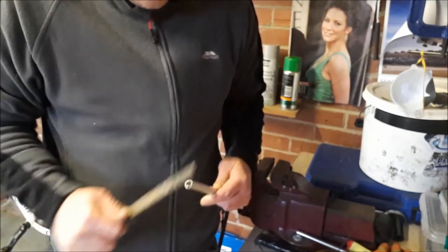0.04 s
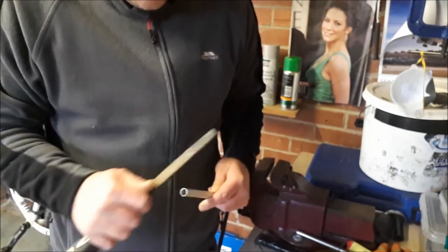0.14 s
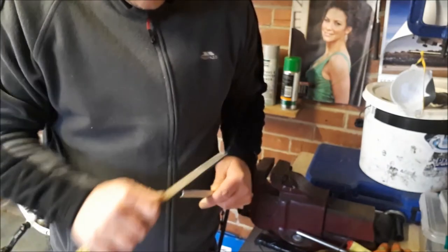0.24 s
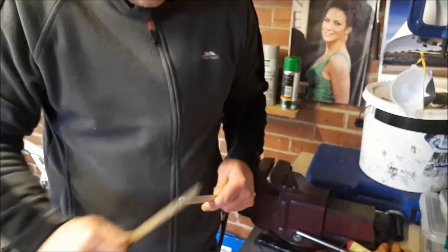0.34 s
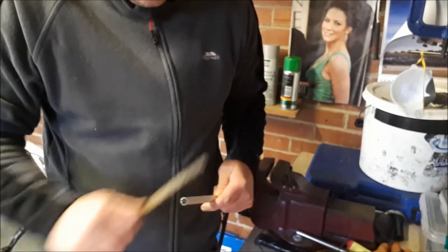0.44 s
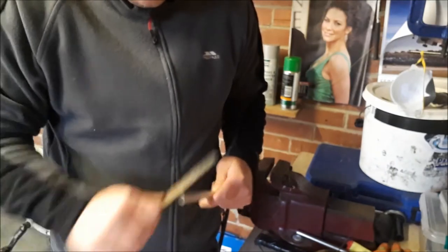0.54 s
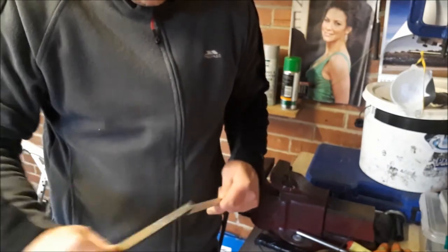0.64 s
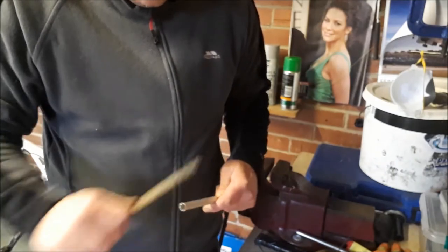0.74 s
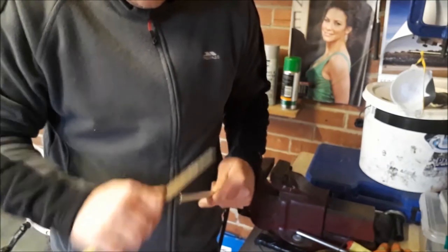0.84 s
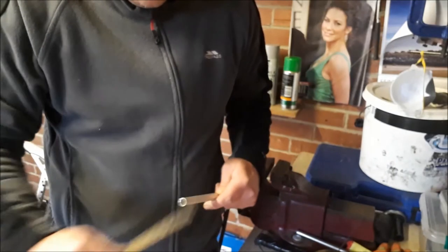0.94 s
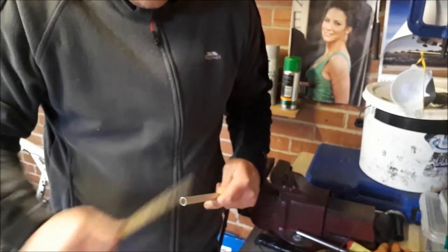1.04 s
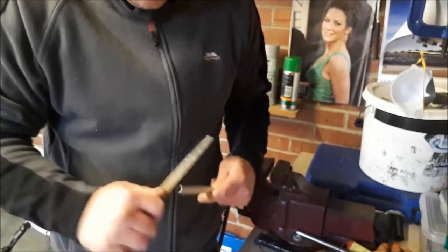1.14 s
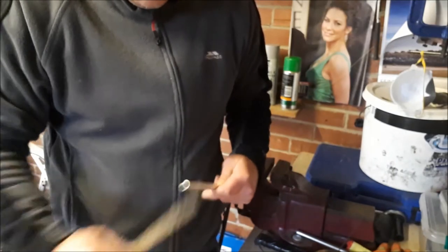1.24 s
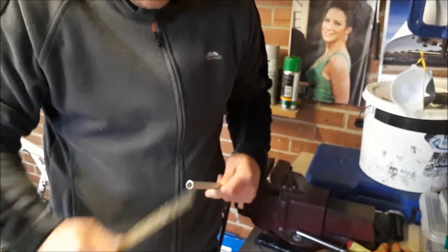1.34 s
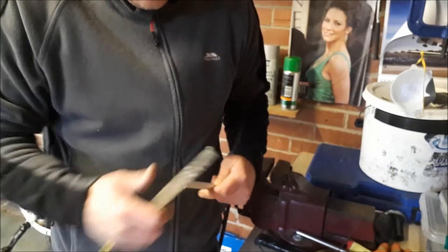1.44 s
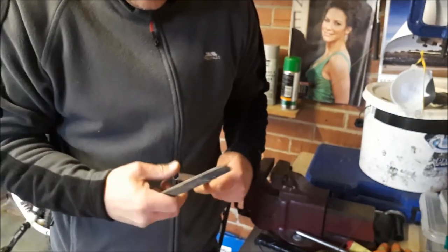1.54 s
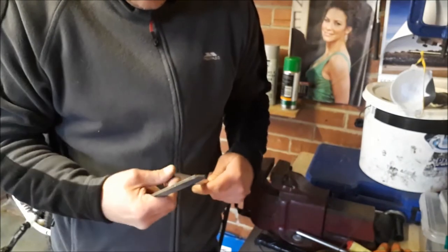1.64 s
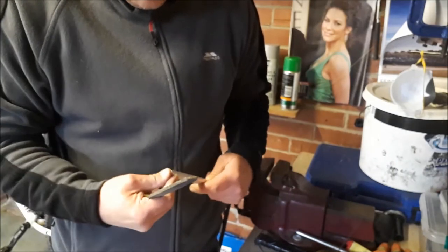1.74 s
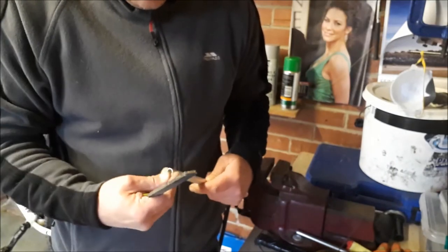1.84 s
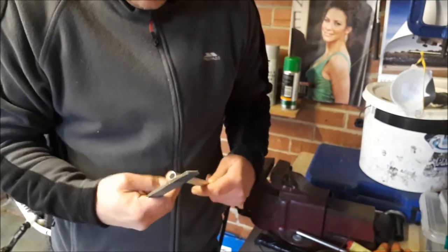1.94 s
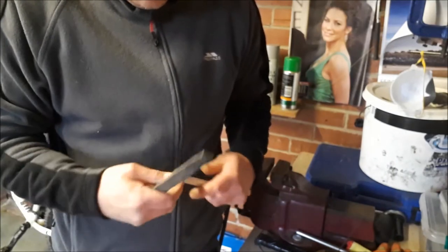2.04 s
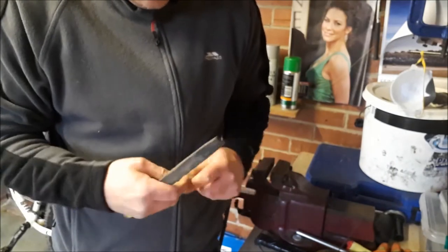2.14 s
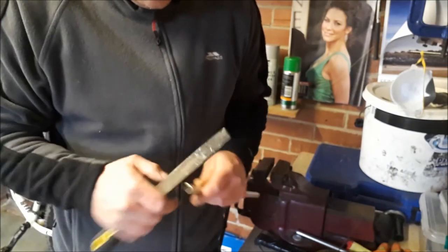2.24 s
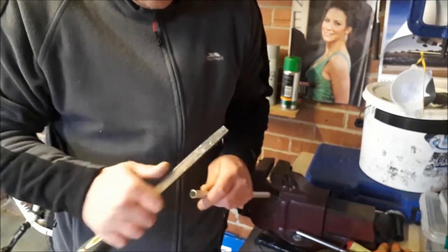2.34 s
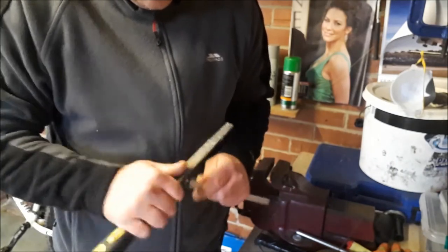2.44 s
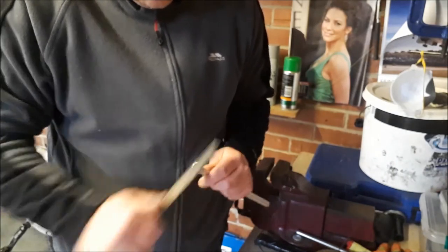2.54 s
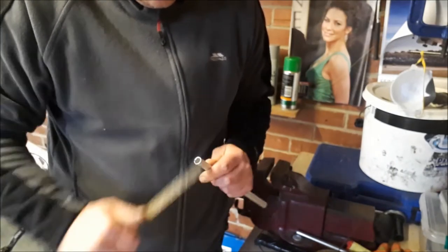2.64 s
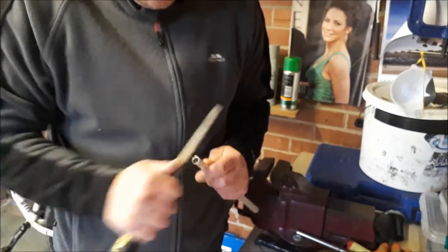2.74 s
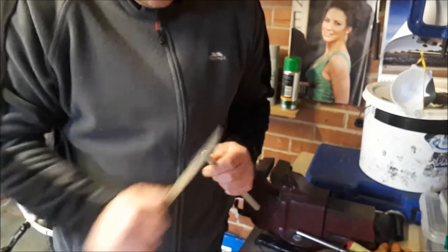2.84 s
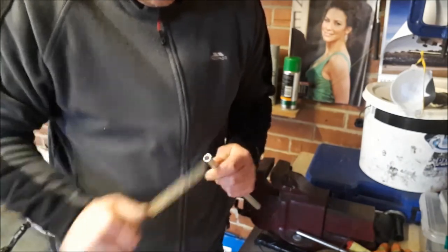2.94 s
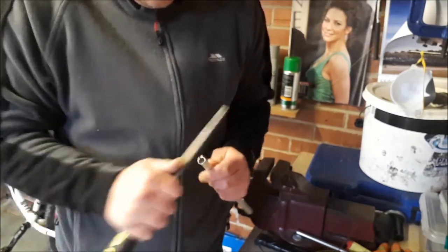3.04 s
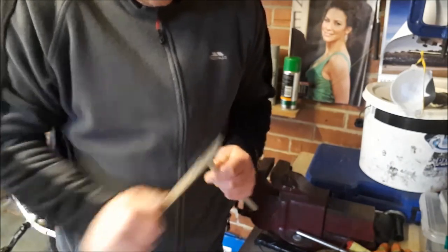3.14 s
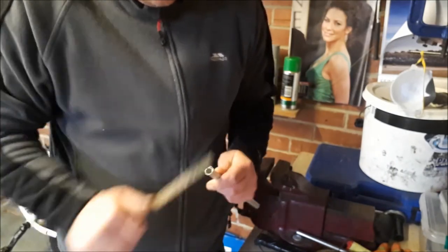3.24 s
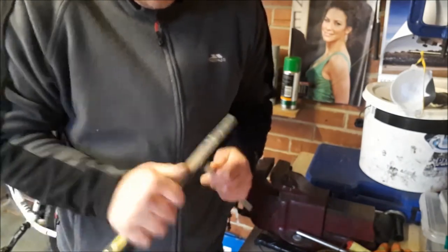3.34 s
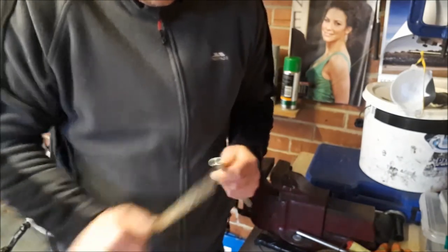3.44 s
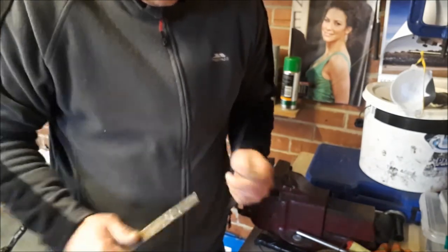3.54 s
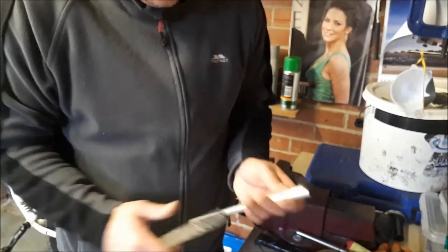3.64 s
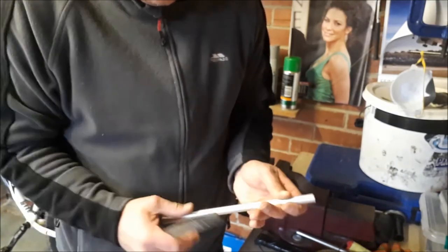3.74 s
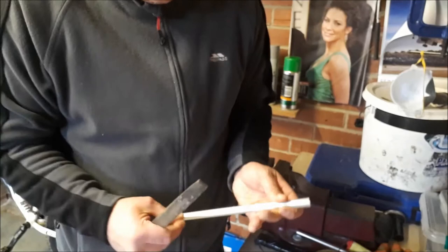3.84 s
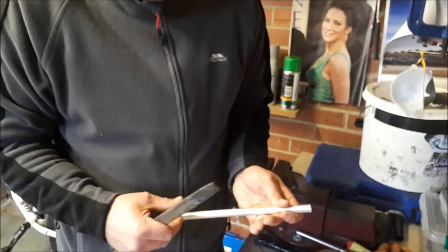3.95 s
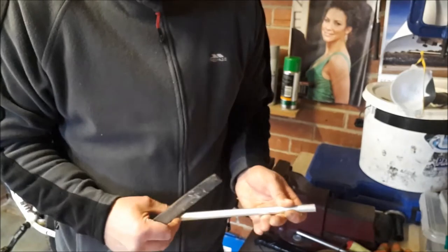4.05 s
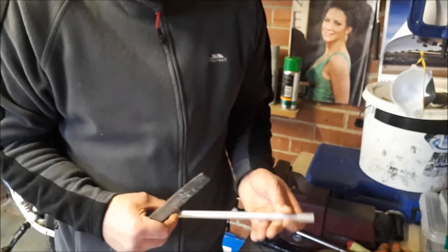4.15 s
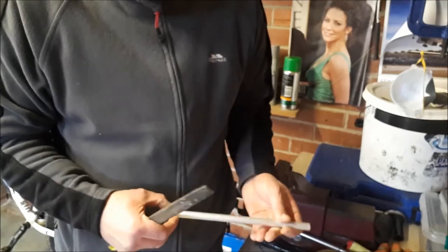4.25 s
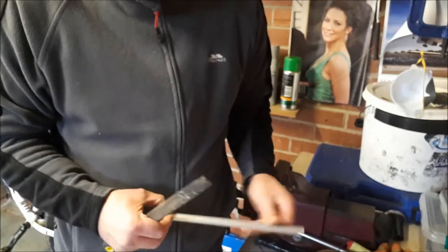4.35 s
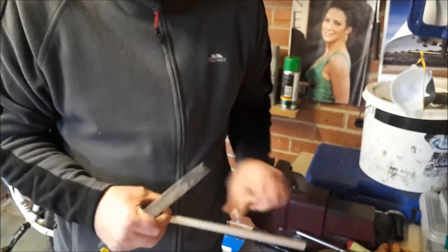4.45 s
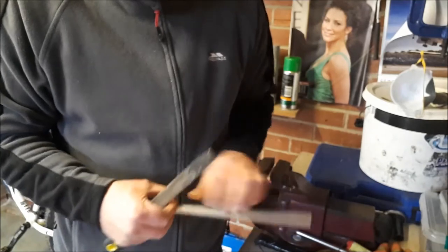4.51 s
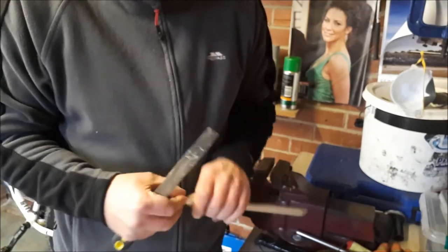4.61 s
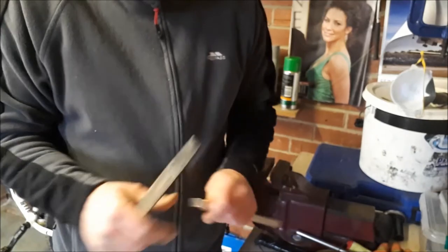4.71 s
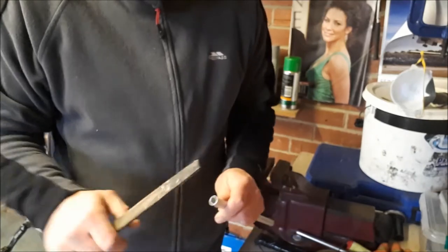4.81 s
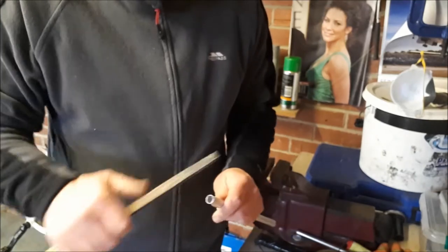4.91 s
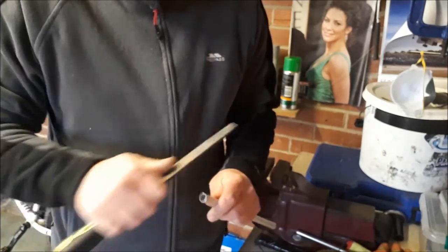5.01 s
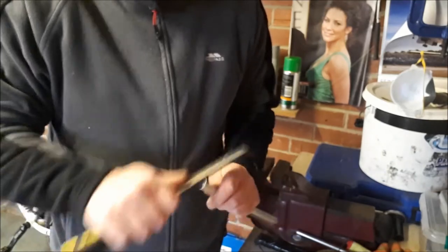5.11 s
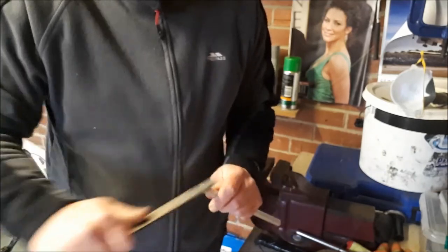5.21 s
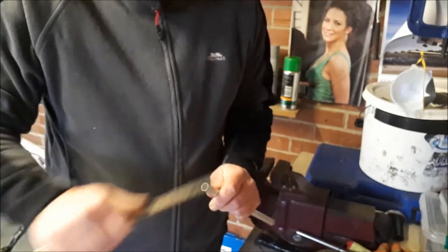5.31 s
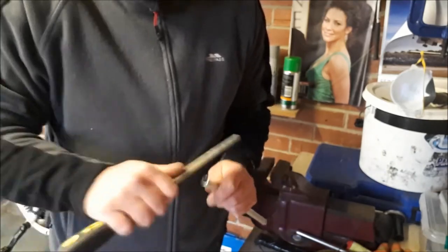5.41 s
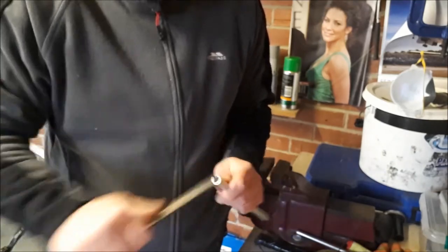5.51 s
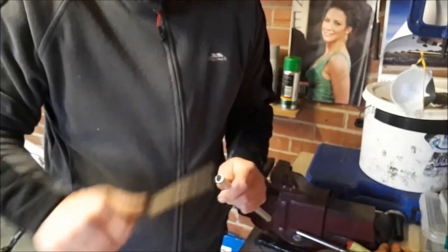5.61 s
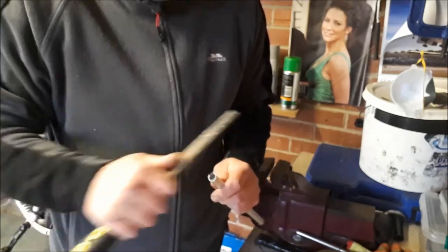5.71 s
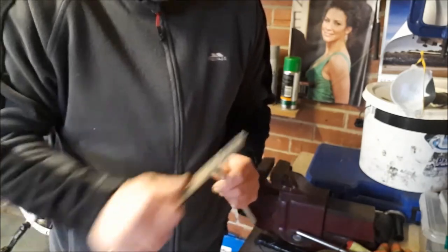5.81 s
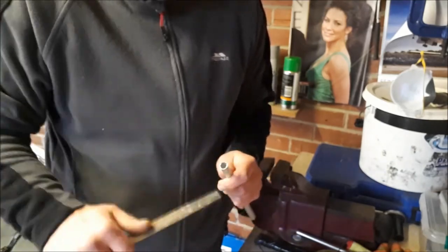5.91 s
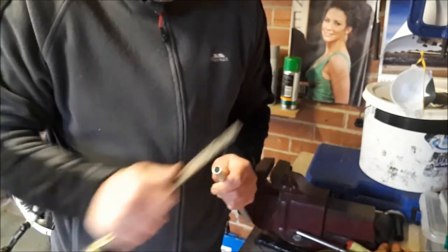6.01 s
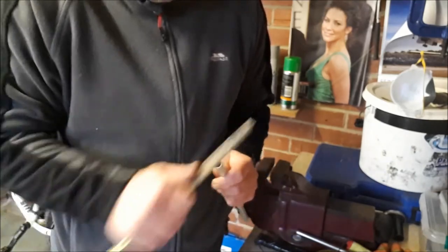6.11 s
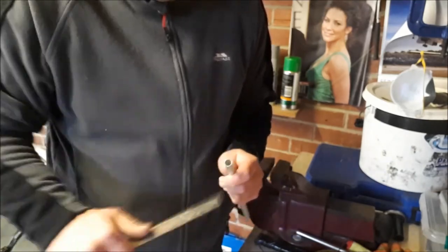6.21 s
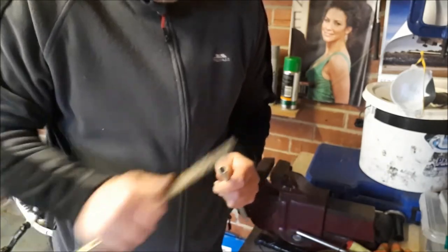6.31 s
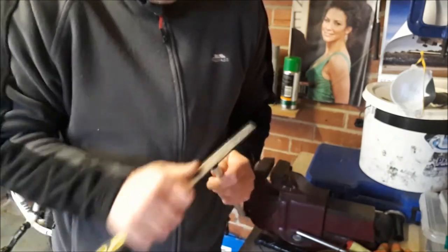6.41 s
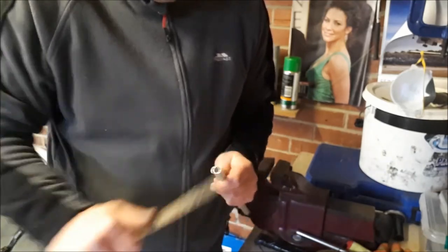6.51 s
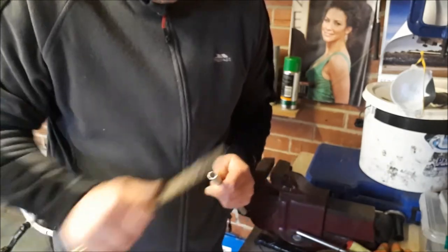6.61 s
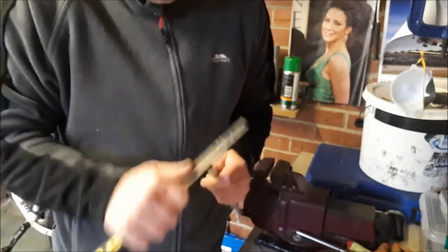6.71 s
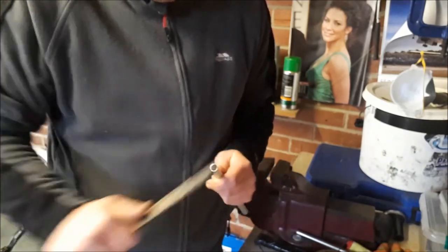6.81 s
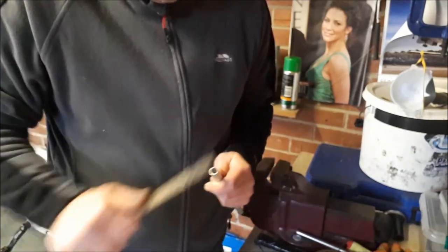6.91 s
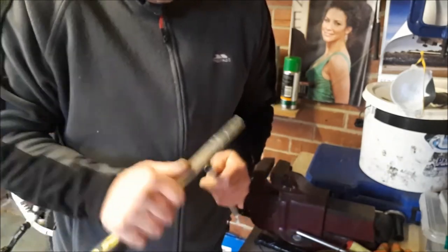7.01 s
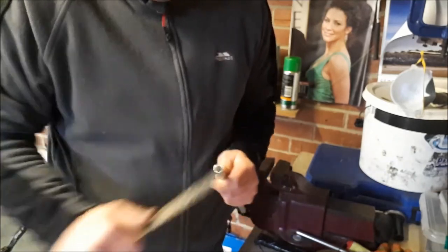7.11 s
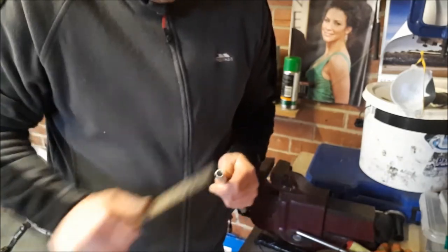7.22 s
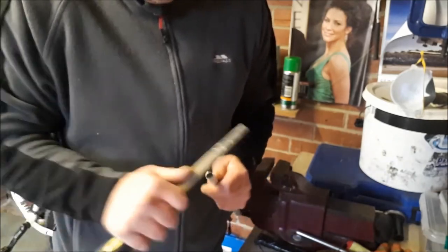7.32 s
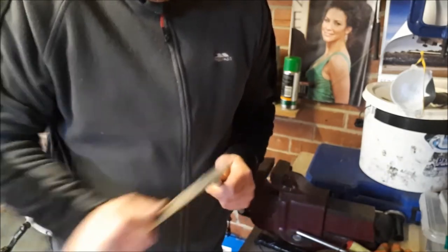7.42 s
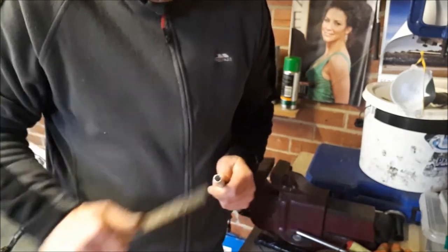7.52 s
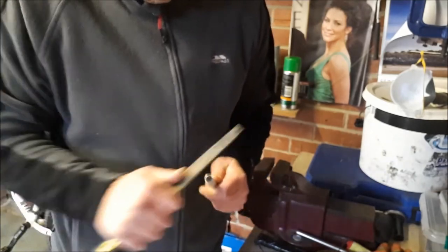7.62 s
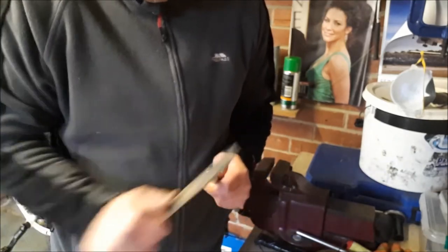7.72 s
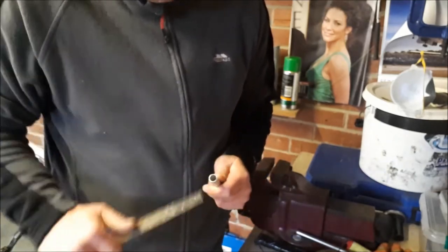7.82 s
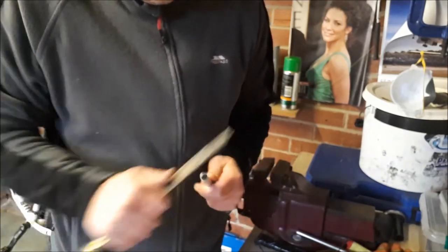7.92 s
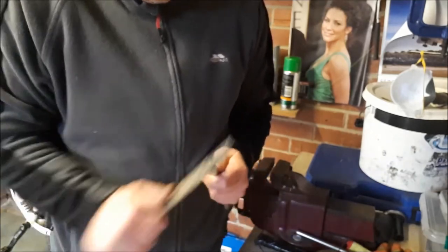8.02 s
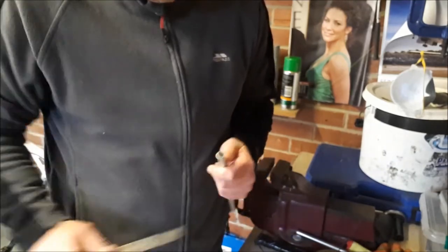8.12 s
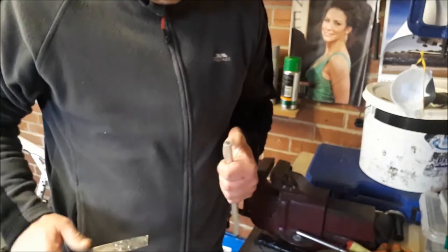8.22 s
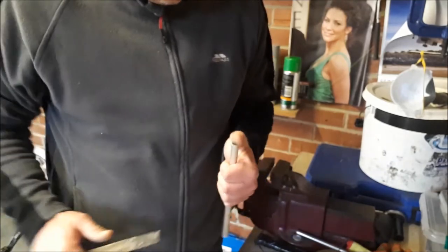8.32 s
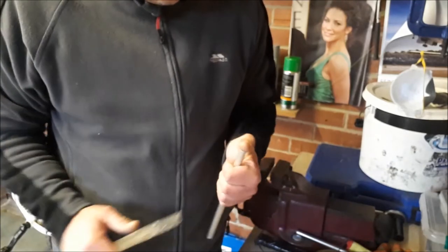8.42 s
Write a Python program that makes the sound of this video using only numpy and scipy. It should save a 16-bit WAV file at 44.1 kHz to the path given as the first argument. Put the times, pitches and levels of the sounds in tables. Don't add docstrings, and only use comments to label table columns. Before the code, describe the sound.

Close, bright and dry in a small garage, over a low steady bed of mains hum, far fan and dull traffic drone. A faint tail of a scrape opens at 0 s, then file strokes at about 0.26, 0.6, 0.9 and 1.2 s: a light click followed by a gritty rasp of roughly a tenth of a second. From 1.4 to 2.5 s only tiny finger rustles on steel. Four harder strokes follow at 2.5, 2.8, 3.15 and 3.4 s, with strong clicks and burrs snagging the teeth. From 3.7 to 5.1 s it is nearly quiet, with faint rustles and thin metallic touches. At 5.2 s filing resumes with strokes about every 0.3 s until 8.0 s, a small double contact near 5.5 s, the landings growing sharper. Each stroke rings mostly around 2.5 to 3 kHz with no bass and a short room tail. A slight rustle at 8.2 s ends it.

```python
import sys
import numpy as np
from scipy import signal
from scipy.fft import rfft, irfft
from scipy.io import wavfile

SR = 44100
rng = np.random.default_rng(int(sys.argv[2]) if len(sys.argv) > 2 else 0)


def file_out(sig):
    cols = np.atleast_2d(sig).T
    lim = np.clip(cols, -1, 1)
    pcm = np.round(lim * 32767).astype(np.int16)
    wavfile.write(sys.argv[1], SR, pcm)


def invert_db(x):
    u = np.asarray(x, float) / 20
    return 10 ** u


N = 373086

# frequency in Hz, strength in dB per Hz.
AIR = [(25, -50), (60, -37.5), (130, -8.5), (260, -10), (450, -11), (880, -9), (1350, -16), (2000, -17),
       (3150, -27.5), (3380, -34), (5500, -38.5), (7000, -33.5), (9200, -43), (16000, -51)]
AIR_DB = -48.5
# frequency in Hz, likeness from 0 to 1.
AIR_LIKENESS = [(60, 1), (180, 0.91), (550, 0.92), (1650, 0.3), (4970, 0.053), (15000, 0.0184)]
# frequency in Hz, left over right in dB.
AIR_BALANCE = [(60, -12), (150, 8), (380, -3), (950, 0), (2380, -1), (5980, -4.5), (15000, 8.5)]
# frequency in Hz, width in Hz, rms level in dB.
DRONE = [(35.8, 5.5, -72.5), (102, 26, -58.5), (310.8, 7, -60), (409, 25, -57), (458.6, 45, -50.5),
         (557, 27, -55), (655.4, 62, -55.5), (730, 11.1, -79), (858, 26, -57)]
FAN_LAG_S = 0.00035
# time in seconds, level in dB.
RUMBLE = [(0.0, -58.5), (0.87, -52), (2.12, -57), (4.729, -58), (4.9, -57), (5.301, -56), (5.77, -61),
          (6.01, -56), (6.41, -69), (7.66, -74), (7.84, -53), (8.46, -80)]

# start in seconds, then seconds after it when the push begins, is full,
# and lifts, then tooth chatter in Hz.
STROKES = [(0.0, 0.0045, 0.0081, 0.023, 2400), (0.257, 0.032, 0.056, 0.15, 2930),
           (0.6075, .01, 0.062, 0.12, 3251), (0.9255, 0.0089, 0.029, 0.089, 2955),
           (1.2294, 0.011, 0.026, 0.087, 2750), (2.5413, 0.0095, 0.037, 0.1, 2900),
           (2.8418, 0.015, 0.062, 0.099, 2800), (3.147, 0.03, 0.047, 0.13, 2820),
           (3.4255, 0.033, 0.069, 0.081, 2630), (5.171, 0.015, 0.044, .13, 2950),
           (5.5263, .002, 0.014, 0.074, 2850), (5.8421, 0.013, 0.036, 0.088, 2935),
           (6.1531, 0.039, 0.072, 0.089, 2760), (6.4664, 0.052, 0.076, 0.11, 2814),
           (6.7774, 0.057, 0.11, .11, 2700), (7.0896, 0.071, 0.084, 0.097, 2760),
           (7.4003, 0.07, 0.1, 0.11, 2770), (7.7167, .045, 0.081, 0.11, 2450),
           (8.0196, 0.019, 0.041, 0.087, 2646)]
# graze in dB, full push in dB, level at the lift in dB,
# fine grit in dB against the rasp, tube body in dB against the rasp.
EFFORT = [(-45.5, -52, -43, -3, -13), (-36, -25, -26.5, -7, -11), (-28, -21.5, -28.5, -3.5, -5.5),
          (-29, -27, -20, -5, -10), (-28.5, -23.5, -22, -4, -9), (-30, -18.5, -19.5, -8.5, -11),
          (-26, -19, -13.5, -9, -10.5), (-26, -23, -32.5, -8.5, -7.5), (-26, -18.5, -19.5, -7, -7.5),
          (-29.5, -18, -27.5, -5, -12.5), (-23, -23, -38.5, -2, -7), (-23, -21, -16, -10.5, -8),
          (-27, -17.5, -16, -9, -5.5), (-26.5, -19.5, -20, -5.5, -7.5), (-27, -22.5, -16, -6, -7),
          (-27, -19, -21, -6.5, -9), (-31.5, -17.5, -16, -5.5, -9.5), (-27, -22.5, -22, -7, -7),
          (-26.5, -19, -16, -8.5, -13.5)]
# frequency in Hz, strength in dB per Hz.
RASP = [(290, -50), (500, -15.5), (810, -27.5), (1310, -9.5), (1450, -10.5), (3020, 0.5), (3880, -4),
        (7710, -23.5), (12100, -19.5), (15100, -9.5), (16500, -53)]
GRIT_GROWS_DB, BODY_GROWS_DB, CHATTER_SAG = 3.5, 1, 0.03
LIFT_S = 0.024
BOUNCE_DB, BOUNCE_S = -4, 0.018
GRAZE_SAG_DB_PER_S = 67

# time in seconds, peak in dB, bright part in dB against the peak,
# knock in Hz, thin ring in dB.
LANDINGS = [(0.258, -22, -1.5, 1780, -2.5), (0.6074, -16.5, -10, 3230, -12), (0.9248, -19.5, 0, 3300, -7),
            (1.2283, -13.5, -5.5, 3360, -1.5), (2.539, -13, -5, 2400, -3.5), (2.842, -6, -2.5, 2517, -9),
            (3.1458, -4.5, -3.5, 2560, 2.5), (3.4256, -5, 1, 2640, -1.5), (5.1697, -17, -3, 2585, -17),
            (5.506, -19, -4, 2690, -5), (5.5252, -17, -5.5, 2995, -15), (5.8425, -10.5, -24, 2810, 13),
            (6.1537, -11, -21, 2700, 2), (6.4676, -7, 3, 2860, -8), (6.7792, -7.5, -36, 2830, -1),
            (7.0901, -5.5, 6.5, 2820, 0), (7.398, -5, 2.5, 2590, -7), (7.7167, -3, -1, 2574, -10),
            (8.0209, -6.5, -8.5, 2590, 5)]
# frequency in Hz, level in dB.
RIM_PINGS = [(3700, 0), (3500, -0.5), (3420, 5), (4000, 2.5), (3660, -3), (5125, -5), (4120, 0),
             (4170, 4.5), (3380, -6.5), (3360, -0.9), (5200, 3), (3480, 0.5), (4100, -10), (3470, 0.5),
             (3570, 4), (4085, 2.5), (4165, 0.5), (4300, -4.3), (4100, -12)]
PING_DB, PING_S = -8, 0.0013

# frequency in Hz, width in Hz, level in the first grip in dB,
# level in the later grip in dB, left over right in dB.
STEEL = [(1210, 340, -22, -16.5, -2), (1850, 300, -10, -14, 5.5), (2850, 380, -14, -7.5, -10),
         (3710, 270, -23, -8.5, -7.5), (4240, 250, -11, -11.5, 3), (4860, 250, -14, -11, 1),
         (6200, 330, -16, -19.5, 8.5), (7100, 340, -20.5, -16.5, -19), (8460, 25, -14.5, -34, 7.5),
         (8250, 110, -24, -23.5, 2.5), (9480, 350, -16.5, -34, 4), (10650, 690, -15, -20, 9.5),
         (11500, 940, -10, -19, 4)]
REGRIP_S = 2.0
# lowest mode in dB, second mode in dB, fourth mode in dB, high pair in dB.
HOLD = [(0.1, 8, 0.1, 0.1), (3, 3.8, 2.1, 0), (2, -5.5, -3, 0), (-1, 1.9, 0.1, 3), (-9, 2.5, -1.1, -1),
        (-10, 1.3, -1.5, -7), (2.5, -3, 4, -1.5), (-1, -5, -3, 2.5), (-1.5, -5, -3, 0.5), (3, -2, -2, -7),
        (5, 1, 0.1, 2), (5, -3, 3, -12), (-1, 4.5, -2, -3), (-1.5, 1, -1.1, 0), (-5, -1, 1, -2.5),
        (2, 2, 3, -0.5), (3, -4, -2.5, 1.5), (-1, -1.5, -6.5, -1), (-1.5, 2, 0.5, 2.5), (-1, 4, 1, 1.5)]
# frequency in Hz, width in Hz, level in dB,
# left over right in dB.
FREE_MODES = [(1388, 45, -19, 0), (2345, 25, -11.5, -0.5), (2760, 40, -8, -1.1), (4080, 45, -13, 0.1)]

# ring near the tip in Hz, near the handle in Hz,
# their level in dB against the rasp, side ring in Hz, its level in dB against the rasp.
GRIP_RINGS = [(2080, 2290, -19, 3410, -10.5), (3380, 2710, 1, 6000, -8), (3230, 2600, -15, 1210, -18.5),
              (2310, 2560, -15, 3600, -15), (2950, 3040, -2.5, 6300, -12), (2700, 2970, -1.5, 1315, -8.5),
              (2790, 2200, -8.5, 4000, -19), (2660, 2830, -4, 4800, -5.5), (2990, 3030, 0.5, 4400, -13),
              (2960, 1900, -3.5, 3800, -10), (2990, 3000, -2.5, 1400, -6), (2700, 2400, 1, 1590, -14),
              (2840, 2500, -6.5, 3200, -17), (2160, 2600, -7, 1035, -16), (2750, 2870, -4.5, 4400, -7),
              (2760, 2976, -10, 2320, -13.5), (2590, 2760, -6, 2900, -8), (1720, 2600, -4.5, 860, -9)]
HANDOVER_AT = [0.72, 0.67, 0.63, 0.86, 0.505, 0.56, .52, .52, 0.5, 0.61, 0.44, .52, 0.59, 0.48, 0.73, 0.56,
               0.56, .85]
HANDOVER = 4

# time in seconds, peak in dB, ring in
# Hz.
CATCHES = [(0.3122, -20, 2060), (0.3331, -17, 3430), (0.346, -23, 3240), (0.631, -17, 3240),
           (0.6663, -17, 3360), (0.693, -13, 2590), (0.7114, -11, 2660), (0.9598, -15, 3200),
           (0.972, -17, 3230), (0.999, -18.0, 3130), (1.2726, -17, 1910), (1.2974, -20, 1930),
           (2.5916, -24, 2940), (2.6197, -11, 2950), (2.632, -15.9, 2470), (2.8889, -4, 2750),
           (2.924, -4, 2900), (2.937, -15.5, 2760), (3.1793, -30, 2790), (3.201, -17, 2890),
           (3.4833, -21, 2760),
           (5.2288, -13, 3000), (5.2737, -16, 2990), (5.2826, -17.7, 2950), (5.868, -8, 2950),
                 (5.892, -12, 2660), (5.911, -16, 2720), (5.923, -12, 2870), (6.171, -14, 2765),
                 (6.1778, -13.5, 2750), (6.1862, -12, 2740), (6.4928, -20, 2820), (6.52, -22.5, 3370),
                 (6.55, -11, 2990), (6.8004, -27, 2800), (6.8307, -18, 2120), (6.8706, -18.5, 2650),
                 (6.8823, -21.8, 2770), (7.174, -14, 2810), (7.4437, -22, 2750), (7.4593, -24, 2730),
                 (7.4711, -22, 2140), (7.4937, -18.5, 2960), (7.7525, -20.5, 1900), (7.7944, -25, 2260),
                 (7.8147, -15.5, 2280), (8.058, -17, 1860), (8.095, -19, 2620)]
CATCH_RISE_S, CATCH_FALL_S, CATCH_SWELL_DB, CATCH_RING_DB = 0.0018, 0.0026, 2.5, -2

# start in seconds, length in seconds, rustle in dB, rustle in Hz, ring in dB.
TOUCHES = [(1.457, .003, -62, 5900, -91), (1.716, .015, -71, 8100, -83), (1.754, .027, -65, 7500, -80),
           (1.89, .035, -69, 7400, -88), (1.923, .005, -69, 10500, -82), (1.936, 0.012, -61.5, 7650, -79),
           (2.03, 0.098, -82, 8400, -81), (2.125, .085, -64, 14200, -88), (2.135, .06, -72, 9050, -86),
           (2.14, .05, -75, 5500, -90), (3.675, 0.064, -59.5, 3100, -68), (3.697, .035, -68, 12500, -73),
           (3.699, .028, -59.5, 5800, -67), (3.702, .003, -62, 9000, -80), (3.74, .053, -79, 9000, -72.5),
           (3.86, .04, -86, 8450, -78), (4.036, 0.087, -85, 8450, -77.5), (4.385, 0.093, -74, 12500, -76.5),
           (4.392, .06, -75, 7030, -84), (4.641, 0.012, -69.5, 9500, -68), (4.714, 0.021, -71, 11500, -65),
           (4.717, 0.016, -61.5, 5340, -76), (8.192, .066, -73, 12100, -74)]
# frequency in Hz, seconds to fall by 60 dB.
GARAGE_T60 = [(500, 0.59), (3000, 0.25), (8000, 0.22), (16000, 0.15)]
# frequency in Hz, left over right in dB.
PORTS = [(700, 3.5), (1300, -2), (2400, -1), (4400, -1.5), (6800, -3.5), (8400, 16.5), (11000, -2.5),
         (15000, 0.5)]


def at_hz(points, hz):
    table_hz, values = np.array(points).T
    return np.interp(np.log(hz + 1), np.log(table_hz), values)


def rms_one(x):
    return x / np.sqrt(np.mean(x ** 2) + 1e-20)


def left_right(db):
    return invert_db([[db / 2], [-db / 2]])


def coloured(x, db):
    return irfft(rfft(x) * invert_db(db), x.shape[-1])


def causal(x, db):
    fold = np.r_[1, 2 * np.ones(N // 2 - 1), 1, np.zeros(N // 2 - 1)]
    folded = irfft(db * np.log(10) / 20, N) * fold
    return irfft(rfft(x) * np.exp(rfft(folded)), N)


def band(x, lo_hz, hi_hz):
    return signal.sosfilt(signal.butter(2, [lo_hz, hi_hz], "band", fs=SR, output="sos"), x)


def resonance(x, hz, width):
    r = np.exp(-np.pi * width / SR)
    poles = [1, -2 * r * np.cos(2 * np.pi * hz / SR), r * r]
    return signal.lfilter([(1 - r * r) / 2, 0, (r * r - 1) / 2], poles, x)


def drift(rate):
    r = np.exp(-64 * np.pi * rate / SR)
    noise = rng.standard_normal(N // 32 + 2002)
    slow = signal.lfilter([1], [1, -2 * r, r * r], noise)[2000:]
    return np.interp(np.arange(N) / 32, np.arange(len(slow)), rms_one(slow))


def grit(per_s, spread_db):
    force = invert_db(spread_db * np.minimum(rng.exponential(1, N), 3.5))
    sizes = force * rng.choice([-1, 1], N)
    return rms_one(sizes * (rng.random(N) < per_s / SR))


def air():
    t, hz = np.arange(N) / SR, np.fft.rfftfreq(N, 1 / SR)
    mid, side = rng.standard_normal((2, N))
    colour = invert_db(2 * at_hz(AIR, hz))
    power = invert_db(AIR_DB) ** 2 * colour / np.sum(colour)
    for centre, width, db in DRONE:
        line = 1 / (1 + (2 * (hz - centre) / width) ** 2) ** 2
        power += invert_db(2 * db) * line / line.sum()
    alike = np.clip(at_hz(AIR_LIKENESS, hz), -1, 1)
    lean = at_hz(AIR_BALANCE, hz) / 2
    pair = np.sqrt(1 + alike) * rfft(mid) + np.sqrt(1 - alike) * rfft(side) * [[1], [-1]]
    pair[0] *= np.exp(-2j * np.pi * hz * FAN_LAG_S)
    tone = irfft(pair * np.sqrt(power * N / 4) * invert_db([lean, -lean]), N)

    hum = invert_db(-49.0 + 2.0 * drift(4.8)) * np.sin(2 * np.pi * 100 * t + 0.38 * drift(7.0))
    s, rumble_db = np.transpose(RUMBLE)
    rumble = rms_one(band(rng.standard_normal(N), 62, 116)) * invert_db(np.interp(t, s, rumble_db))
    return tone + hum + rumble


def pressure():
    t, out = np.arange(N) / SR, np.zeros((4, N))
    for stroke, effort in zip(STROKES, EFFORT):
        s, begins, full, lift, chatter_hz = stroke
        graze_db, push_db, lift_db, fine_db, body_db = effort
        touch = np.clip(np.minimum((t - s) / 0.0011, (s + lift - t) / LIFT_S + 0.5), 0, 1) ** 2
        on = touch > 0
        age = t[on] - s
        along = age / lift - 0.5
        rasp_db = np.interp(age, np.sort([begins, full, lift]), [graze_db, push_db, lift_db])
        rasp_db += GRAZE_SAG_DB_PER_S * np.clip(begins - age, 0, 1)
        skip_db = BOUNCE_DB * np.exp(-(age / BOUNCE_S) ** 2)
        levels = [rasp_db + 0.36 * skip_db,
                  rasp_db + skip_db + fine_db + GRIT_GROWS_DB * along,
                  rasp_db + 1.5 * skip_db + body_db + BODY_GROWS_DB * along]
        out[:3, on] = touch[on] * invert_db(np.array(levels))
        out[3, on] = chatter_hz * (1 - CHATTER_SAG * along)
    return out


def warble(hz, width):
    turn = np.exp(2j * np.pi * np.cumsum(hz) / SR)
    slow = np.array([drift(width) + 1j * drift(width) for _ in range(3)])
    return ((slow[0] + 0.31 * slow[1:]) * turn).real


def landings():
    blow, spray, knock = np.zeros(N), np.zeros(N), np.zeros((2, N))
    age = np.arange(500) / SR
    dying = np.exp(-(age / np.array([[0.0021], [0.0026]])) ** 1.6)
    swelling = (age / PING_S * np.exp(1 - age / PING_S)) ** 2
    for (s, peak_db, bright_db, hz, ring_db), (ping_hz, ping_db) in zip(LANDINGS, RIM_PINGS):
        start = round(s * SR)
        i = slice(start, start + 500)
        ticks = rng.standard_normal(500)
        blow[i] = invert_db(peak_db) * 1.32 * np.exp(-age / 0.00008)
        spray[i] = invert_db(peak_db + bright_db) * age / 0.0015 * np.exp(-age / 0.0015) * ticks
        rising = 2 * np.pi * 0.948 * hz * age * (1 + np.array([[40.0], [15.0]]) * age)
        knock[:, i] = -invert_db(peak_db) * 0.83 * np.sin(rising) * dying
        knock[:, i] += invert_db(peak_db + ping_db + PING_DB) * swelling * np.sin(2 * np.pi * ping_hz * age)
    return blow, spray, knock


def steel(drives, wander_db, detune):
    out = np.zeros((2, N))
    landed = [(0, 0)] + [(row[0], row[4]) for row in LANDINGS]
    starts = [round(s * SR) for s, ring_db in landed] + [N]
    for k, (hz, width, first_db, later_db, pan_db) in enumerate(STEEL):
        source = 1 if hz > 5500 else 2 if hz < 2100 else 0
        drive = drives[source] * invert_db(wander_db * drift(16))
        ports = left_right(pan_db) * [[1], [(-1) ** (k // 2)]]
        shifts = rng.standard_normal(30)
        for (s, ring_db), hold, i, j, shift in zip(landed, HOLD, starts, starts[1:], shifts):
            share_db = later_db if s > REGRIP_S else first_db
            if 8000 < hz < 9000:
                share_db += ring_db
            held_db = dict(zip((0, 1, 3, 6, 7), (*hold, hold[-1])))
            share_db += held_db.get(k, 0)
            part = np.pad(drive[i:j], (0, 4000))[:N - i][:16000]
            rung = resonance(part, hz + detune * width * shift, width) / np.sqrt(width / 60)
            out[:, i:i + len(part)] += invert_db(share_db) * ports * rung
    return out


def contact(bites, width):
    out, age = np.zeros((2, N)), np.arange(-100, 11900) / SR
    for stroke, rings, at in zip(STROKES[1:], GRIP_RINGS, HANDOVER_AT):
        s, begins, full, lift, chatter_hz = stroke
        tip_hz, handle_hz, db, side_hz, side_db = rings
        start = round(s * SR)
        i = slice(start - 100, start + 11900)
        late = np.clip(0.5 + HANDOVER * (age / lift - at), 0, 1)
        voices = ((tip_hz, invert_db(db) * np.sqrt(1 - late)),
                  (handle_hz, invert_db(db) * np.sqrt(late)),
                  (side_hz, invert_db(side_db)))
        for hz, gain in voices:
            part = bites[:, i] * gain * invert_db(1.3 * drift(23)[i])
            out[:, i] += resonance(0.85 * part + 0.45 * part[::-1], hz, width)
    return out


def catches():
    swell_db, ring, age = np.zeros(N), np.zeros((2, N)), np.arange(-300, 900) / SR
    shape = np.exp(-np.where(age < 0, (age / CATCH_RISE_S) ** 2, age / CATCH_FALL_S))
    for s, peak_db, hz in CATCHES:
        start = round(s * SR)
        i = slice(start - 300, start + 900)
        swell_db[i] += CATCH_SWELL_DB * shape
        wave = np.sin(2 * np.pi * hz * age + np.array([[0.6], [-0.6]]))
        ring[:, i] += invert_db(peak_db + CATCH_RING_DB) * shape * wave
    return swell_db, ring


def filing():
    rasp, fine, body, chatter_hz = pressure()
    swell_db, caught = catches()
    hz = np.fft.rfftfreq(N, 1 / SR)
    lumps = invert_db(2.0 * drift(150) + 0.28 * drift(45) + swell_db - 2.56)
    shared = grit(6000, 3.0)
    own = np.array([grit(6000, 0.74), grit(6000, 1.8)])

    scrape = rms_one(coloured(0.68 * shared + 0.69 * own, at_hz(RASP, hz)))
    along = np.array([scrape[0], np.roll(scrape[1], 8)])
    direct = invert_db(0.5) * rasp * band(scrape, 2000, 5680)
    direct += invert_db(12.0) * fine * band(along, 4190, 11450)
    direct += invert_db(16.5) * body * band(band(along, 650, 1500), 500, 1700) * 1.12
    chatter = invert_db(-14.0) * rasp * warble(chatter_hz, 180)

    blow, spray, knock = landings()
    click = invert_db(-3.0) * knock + invert_db(1.0) * resonance(blow, 4200, 500)
    click += invert_db(-4.5) * band(spray, 2700, 8420)

    bites = lumps * shared
    drives = [bites * invert_db(19) * rasp + invert_db(21) * blow,
              bites * invert_db(26.5) * fine + invert_db(24.5) * spray,
              bites * invert_db(33.5) * body + invert_db(25) * blow]
    rung = steel(drives, wander_db=2.5, detune=0.4)
    own_bites = lumps * own * rasp
    for mode_hz, width, db, pan_db in FREE_MODES:
        rung += invert_db(db) * left_right(pan_db) * resonance(own_bites * invert_db(18.5), mode_hz, width)
    rung += contact(own_bites * invert_db(19.5) + invert_db(-14.0) * blow, width=78)
    return lumps * (direct + chatter) + rung + click + caught


def garage(x, wet_db):
    age, out = np.arange(SR // 3) / SR, np.zeros((2, N + SR))
    edges = 350 * 2 ** np.arange(0, 5.5, 0.5)
    fades = np.array([invert_db(-60 * age / at_hz(GARAGE_T60, lo * 1.97)) for lo in edges])
    fades = fades * np.clip(age / 0.00073 - 0.3, 0, 1)
    noise = np.array([band(rng.standard_normal((2, SR)), lo, lo * np.sqrt(2)) for lo in edges])
    cuts = [0] + [round(row[0] * SR) - 200 for row in LANDINGS] + [N]
    for k, (i, j) in enumerate(zip(cuts, cuts[1:])):
        fresh = noise[:, :, 1400 * k:1400 * k + len(age)]
        tail = np.sum(fresh * fades[:, None], axis=0)
        tail = invert_db(wet_db) * tail / np.sqrt(np.sum(tail ** 2, axis=1, keepdims=True))
        out[:, i:j + len(age) - 1] += signal.fftconvolve(x[:, i:j], tail, axes=1)
    return out[:, :N]


def fingers():
    t, out, ring = np.arange(N) / SR, np.zeros((2, N)), np.zeros(N)
    skin = rng.standard_normal((2, N)) + 0.6 * grit(1500, 2.5)
    skin = skin * invert_db(2.0 * drift(40))
    for s, length, rustle_db, hz, ring_db in TOUCHES:
        start = round(s * SR)
        i = slice(start, start + 12000)
        age = t[i] - s
        shape = np.clip(age / (0.0017 + 0.094 * length), 0, 1)
        shape = shape * np.exp(-np.clip(age - length, 0, 1) / 0.012)
        rub = 0.8 * rms_one(resonance(skin[:, i], hz, 0.09 * hz))
        rub += 0.7 * rms_one(band(skin[:, i], hz * 0.66, min(hz * 1.3, 18000)))
        out[:, i] += invert_db(rustle_db) * shape * rub
        ring[i] += invert_db(ring_db) * shape
    return out + invert_db(25.0) * resonance(ring * grit(150, 2.9), 8445, 34)


def scene():
    near = band(filing(), 750, 19000) + fingers()
    lean = at_hz(PORTS, np.fft.rfftfreq(N, 1 / SR)) / 2
    near = causal(near + garage(near, wet_db=-8.5), np.array([lean, -lean]))
    return air() - near


def band_limit(x):
    return signal.sosfilt(signal.butter(12, 15950, fs=SR, output="sos"), x)


def record(dry):
    rounded = 0.8 * np.tanh(dry / 0.8)
    mix = signal.sosfilt(signal.cheby2(12, 45, 17500, fs=SR, output="sos"), rounded)
    return band_limit(mix)


dry = scene()
out = record(dry)
file_out(out)
```